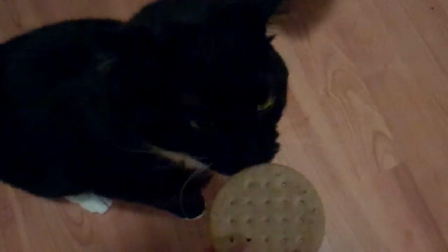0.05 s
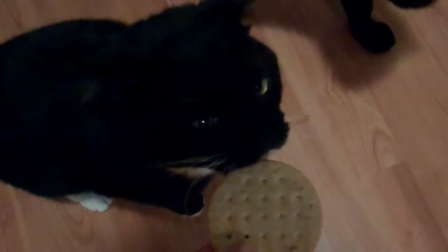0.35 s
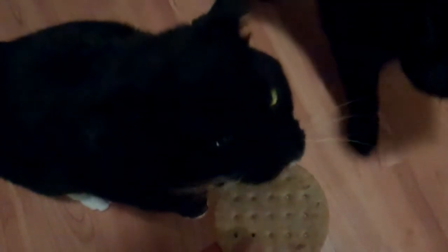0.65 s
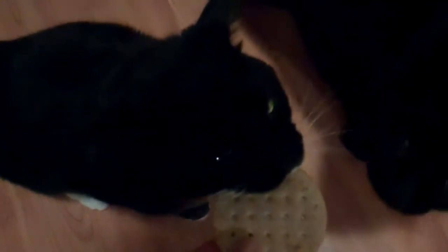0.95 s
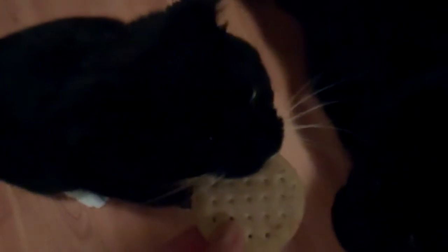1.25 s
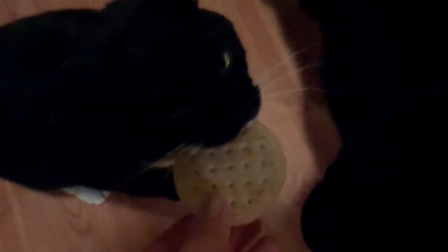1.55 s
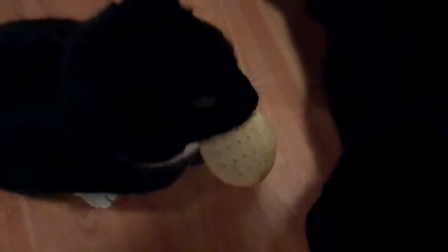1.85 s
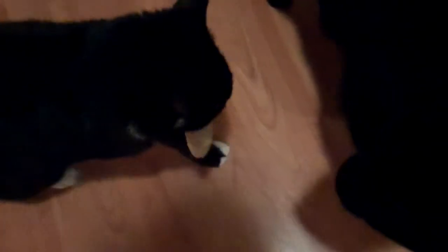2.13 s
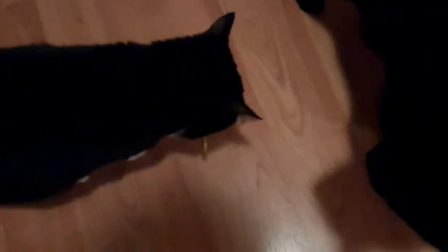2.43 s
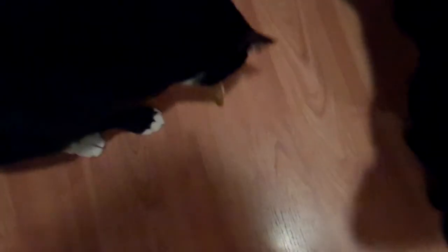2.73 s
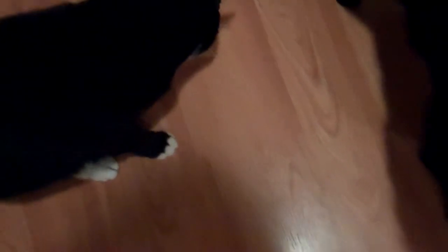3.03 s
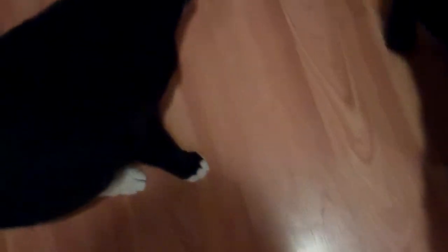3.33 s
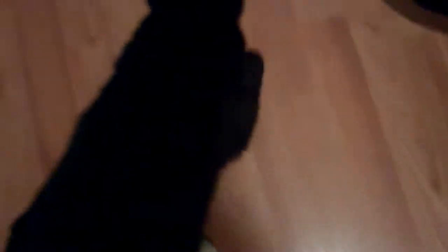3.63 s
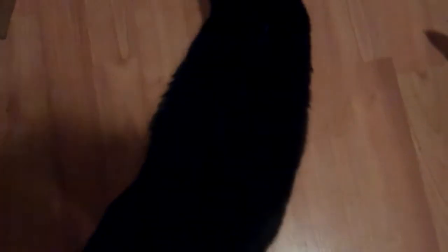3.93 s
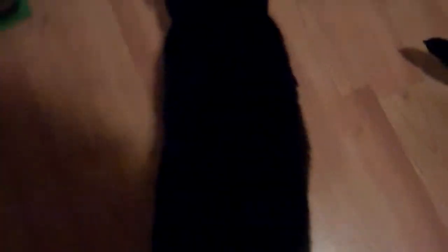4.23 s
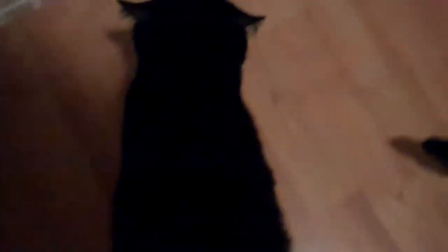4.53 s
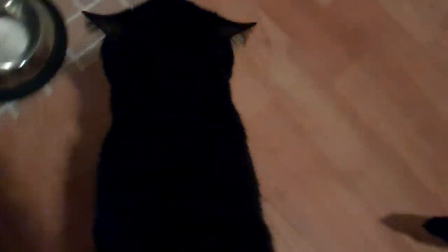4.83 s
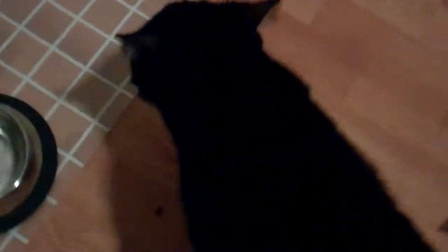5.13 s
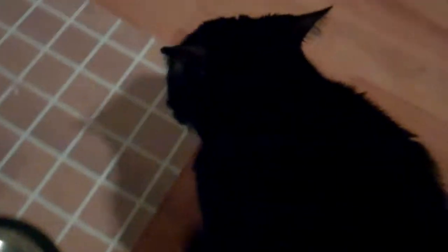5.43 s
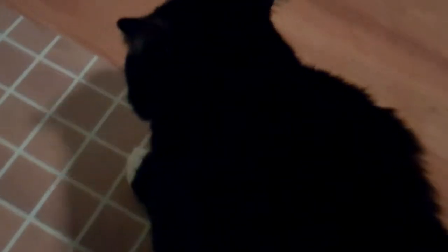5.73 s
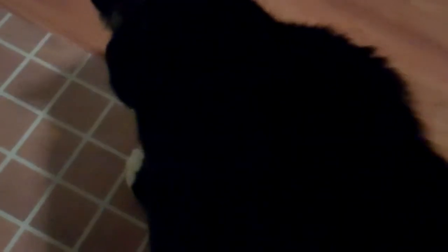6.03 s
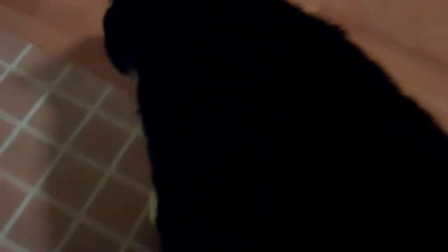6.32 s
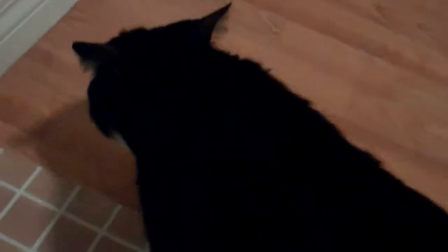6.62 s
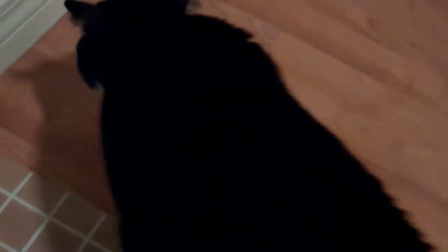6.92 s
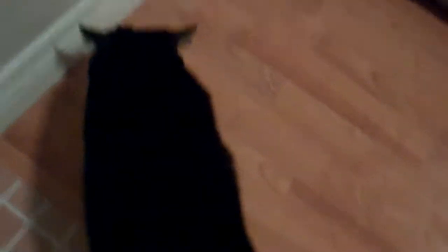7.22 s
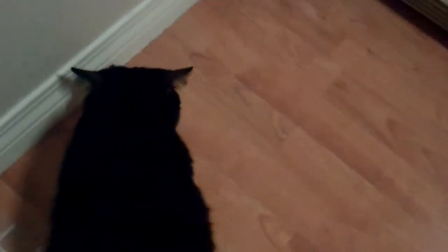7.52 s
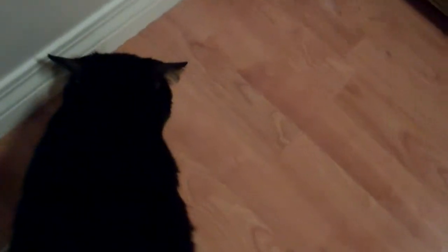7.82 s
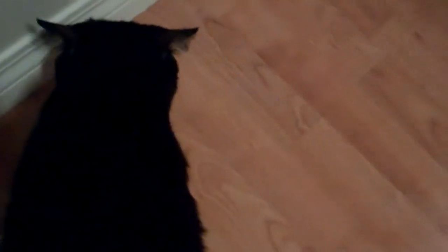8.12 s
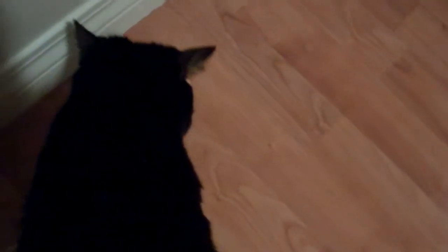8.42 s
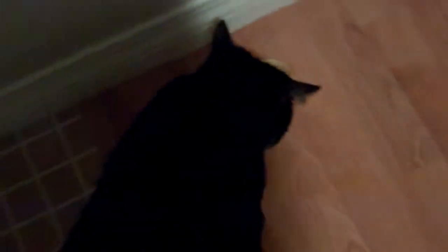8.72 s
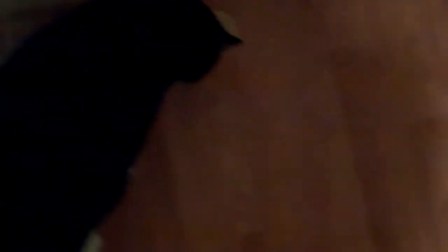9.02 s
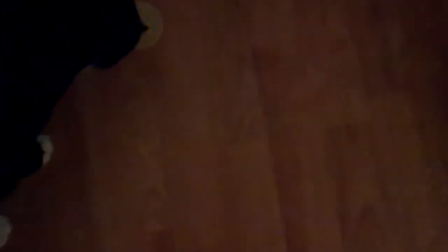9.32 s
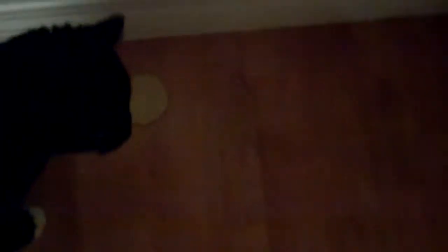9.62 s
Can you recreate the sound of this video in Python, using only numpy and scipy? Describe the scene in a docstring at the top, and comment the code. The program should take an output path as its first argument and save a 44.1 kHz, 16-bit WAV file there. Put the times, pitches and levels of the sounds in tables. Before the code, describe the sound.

Close to the microphones, a cat nibbles a dry cracker with a few faint, brittle snaps. Someone follows across a laminate floor, feet knocking on the hollow boards and clothes swishing, while scattered cracks continue. Near the end comes a busier run of knocks and louder crunches, then a last knock and a sole scuffing. A faint appliance hum and hiss fill the small, hard room.

```python
"""Small dry snaps come first, close to the microphones: a cat nibbles a cracker, carries it across a
laminate floor, crunches it and lets it drop. Each snap is a run of tiny brittle cracks.
Someone follows with the stereo pair: feet knock and scuff on the hollow boards, clothes swish.
Behind it all a mains appliance hums in the small, hard room, and the microphones hiss."""
import sys
import numpy as np
from scipy import signal
from scipy.fft import rfft, irfft, next_fast_len
from scipy.io import wavfile
from scipy.ndimage import map_coordinates

SR = 44100
rng = np.random.default_rng(int(sys.argv[2]) if len(sys.argv) > 2 else 0)


def store_pcm(level_fs):
    """Save levels as 16-bit WAV."""
    pcm = np.round(np.clip(level_fs, -1, 1) * 32767).astype(np.int16)
    wavfile.write(sys.argv[1], SR, np.atleast_2d(pcm).T)


N = 430416
TIME = np.arange(N) / SR
HIT_SAMPLES = 2 ** 15
HIT_HZ = np.fft.rfftfreq(HIT_SAMPLES, 1 / SR)

# Room on snaps and knocks, least at first with the cat close by: (time [s], relative level [dB])
REFLECTIONS = [(1, -8), (3, -1), (4.5, 3), (9.7, -1.5)]
# How the microphones colour a crack, lifting its top: (frequency [Hz], gain [dB])
MIC_SHEEN = [(1000, 8), (3000, 3.5), (5500, 4), (9500, -2), (13500, 6.5)]
# Cracker, teeth and claws, left of centre:
# (time [s], relative level [dB], ring [Hz], left minus right [dB], time to fall 30 dB [s])
BRITTLE_SNAPS = [(0.486, -39, 6000, 5, 0.012), (0.491, -32, 4360, 8, 0.014), (0.687, -43, 2780, 3, 0.008),
                 (0.7191, -29.5, 4900, 8, 0.00082), (0.811, -42.5, 2800, 4, 0.0073),
                 (0.97, -42, 3660, 4, 0.0079), (1.0961, -30, 4050, 7, 0.0036),
                 (1.455, -40.5, 8130, 7, 0.0093), (3.62, -34.5, 6860, 9, 0.017),
                 (3.836, -31.5, 8840, 9, 0.0053), (3.855, -34, 4930, 6, 0.002),
                 (3.919, -24, 11400, 9, 0.0063), (3.954, -26, 6550, 4, 0.0017),
                 (4.194, -24.5, 2280, 6, 0.0095), (4.3585, -30.5, 3250, 7, 0.0074),
                 (4.527, -34, 10680, 9, 0.012), (4.875, -20, 2700, 8.5, 0.12),
                 (5.154, -29, 7510, 10, 0.0036), (5.243, -21, 10300, 15, 0.04),
                 (5.651, -28, 4350, 5, 0.0034), (6.909, -38.5, 7480, 8, 0.012),
                 (6.9695, -30, 4170, 8, 0.01), (7.0149, -24.5, 11400, 10, 0.002),
                 (7.711, -35, 4470, 13, 0.01), (8.214, -19, 4230, 7, 0.027), (8.23, -20, 6960, 4, 0.0064),
                 (8.2734, -26.5, 3830, 10, 0.004), (8.3507, -23.5, 3600, 3, 0.044),
                 (8.357, -25, 6960, 13, 0.0038), (8.454, -9.5, 7100, 6.5, 0.0024),
                 (8.512, -26, 4430, 8, 0.0097), (9.426, -27, 2850, 8, 0.004)]
def snaps():
    """A brittle break is a run of tiny cracks, short in a snap, long in a crunch; the fragment rings."""
    ring_height_db, ring_octaves, bass_cut_db = 4, 0.14, 5
    out = np.zeros((2, N))
    t = np.arange(SR // 25) / SR
    for start, db, ring_hz, pan_db, decay_s in BRITTLE_SNAPS:
        octaves = np.log2((HIT_HZ + 200) / ring_hz)
        ring_db = ring_height_db / (1 + (octaves / ring_octaves) ** 2)
        # a small fragment is weak below its ring, and rolls off above it
        body_db = -bass_cut_db * np.minimum(octaves, 0) ** 2 - 3 * np.log2(1 + 4 ** octaves)
        crack = pulse(ring_db + body_db + along(MIC_SHEEN, HIT_HZ))[:HIT_SAMPLES // 2]
        splinters = stereo_noise(len(t)) * np.abs(rng.standard_normal(len(t))) ** 1.57
        splinters *= amp(-30 * t / decay_s)
        snap = band_limited(signal.fftconvolve(crack[None], splinters, axes=1))
        snap *= np.sqrt(SR / 1000) / np.linalg.norm(snap, axis=1, keepdims=True)  # energy of 1 ms at rms 1
        wet_db = np.interp(start, *np.transpose(REFLECTIONS))
        snap = in_room(snap, early_db=wet_db - 6.5, early_t60=0.024, late_db=wet_db - 10)
        add(out, start, amp(db - 2.1) * lean(pan_db) * snap)
    return out


# The hollow thump of the boards when pitched at THUMP_HZ: (frequency [Hz], level [dB])
THUMP_SPECTRUM = [(40, -26.5), (150, -29.5), (300, -14), (520, -4), (700, 1), (1000, -4.5), (1300, -17.5),
                  (2500, -41), (8000, -37)]
THUMP_HZ = 725
# Wood under a hard contact: (frequency [Hz], width [Hz], level [dB])
CLACK_MODES = [(987, 125, 0), (1510, 180, -4), (1740, 100, -7), (2037, 170, -2.5), (2750, 530, -5.5),
               (3230, 170, -2.5), (3980, 280, -8.5)]
# Narrow floor modes that every blow shares: (frequency [Hz], width [Hz], level [dB])
LAMINATE_MODES = [(234, 24, -3), (533, 19, -4), (641, 9.1, -6), (742, 20, -10.5), (864, 27, -10.5),
                  (1008, 15, -7), (1270, 6.4, 2), (1360, 41, 2), (1712, 55, 5.5)]
# Feet and the dropped cracker on the floor, and the low body of the cat's first bites: (time [s], relative
# level [dB], relative clack [dB], pitch [Hz])
FLOOR_KNOCKS = [(0.4816, -34, 2, 362), (0.7185, -32.5, 8.5, 584), (1.0963, -45, 18, 700),
                (3.618, -45.5, 15, 850), (3.837, -37, 8, 610), (3.921, -39, 13, 700),
                (4.0056, -41.5, 9, 840), (4.1922, -21, 2, 696), (4.8762, -13, -3, 720),
                (4.9623, -28, 1, 640), (7.2304, -21.5, -26, 755), (7.2843, -30.5, -16, 790),
                (7.5197, -13.5, -2.5, 820), (7.5559, -19, -5, 785), (7.5596, -22, -8, 686),
                (7.5626, -22.5, 3, 700), (7.8873, -27, -29, 624), (7.9593, -35, -17, 690),
                (7.9894, -25, -4, 770), (8.0613, -25.5, -16, 710), (8.1063, -16.5, -8.5, 770),
                (8.1193, -22.5, -3.5, 800), (8.185, -33, 6, 770), (8.2084, -23.5, -6, 594),
                (8.2148, -19.5, 4, 690), (8.2303, -24, -3, 850), (8.2495, -30.5, 9, 800),
                (8.2743, -27, -1, 910), (8.3465, -20.5, -4, 760), (8.3593, -22, 0, 920),
                (8.3893, -25.5, 2, 770), (8.4223, -28, 4, 610), (8.4541, -15.5, -5, 816),
                (8.5105, -22.5, 2, 740), (8.6704, -24, -10, 665), (8.8273, -27.5, -7, 710),
                (9.2957, -18, 5.5, 730)]
def knocks():
    """Each blow gives a hollow thump, pitched by where it lands; a hard contact adds a woody clack."""
    out = np.zeros((2, N))
    clack = irfft(resonances(CLACK_MODES, HIT_HZ) / (1 + 1j * HIT_HZ / 4500))
    clack /= np.abs(clack).max()
    for start, db, clack_db, pitch_hz in FLOOR_KNOCKS:
        thump = pulse(along(THUMP_SPECTRUM, HIT_HZ * THUMP_HZ / pitch_hz))
        blow = (thump + amp(clack_db - 3) * clack)[:HIT_SAMPLES // 2]
        wet_db = np.interp(start, *np.transpose(REFLECTIONS))
        blow = in_room(blow, early_db=wet_db - 1.5, early_t60=0.11, late_db=wet_db - 4)
        add(out, start, amp(db - 2) * blow)
    ringing = filtered(out, lambda hz: 1 + sum(resonances([mode], hz) for mode in LAMINATE_MODES))
    return ringing * lean(2.4)


# Short rubs and squeaks: muzzle on the cracker, soles squeaking and sliding on the floor:
# (time [s], length [s], relative level [dB], centre [Hz], width [Hz])
RUBS_AND_SQUEAKS = [(0.415, 0.15, -53.5, 2340, 483), (0.879, 0.13, -50, 2550, 1800),
                    (0.94, 0.064, -58, 3120, 300), (0.88, 0.13, -56, 500, 700),
                    (1.714, 0.34, -55, 10200, 2500), (1.788, 0.32, -61, 1320, 1930),
                    (1.884, 0.1, -55.5, 160, 200), (4.183, 0.13, -55, 230, 130),
                    (2.196, 0.011, -38.5, 1320, 403), (2.59, 0.4, -65, 1310, 500),
                    (5.493, 0.33, -60, 378, 170), (5.649, 0.013, -36.5, 4200, 600),
                    (7.549, 0.018, -25.5, 1520, 650), (7.561, 0.069, -40, 1530, 600)]
# Paws and soles sliding softly on the boards: (time [s], length [s], relative level [dB])
SOFT_SLIDES = [(2.072, 0.2, -55), (2.58, 0.14, -61), (3.215, .15, -60), (3.6, 0.23, -52),
               (3.916, 0.39, -62), (4.197, 0.28, -54.5), (4.426, 0.23, -53), (4.593, 0.26, -59),
               (7.208, 0.36, -53), (7.695, 0.45, -56.5), (8.658, 0.17, -50.5)]
def rubs():
    """Friction swells and fades in one resonance; for the soft slides it is the hollow of the boards."""
    hollow_hz, hollow_width_hz = 723, 580
    out = np.zeros((2, N))
    friction = grainy(rate=260, depth_db=4.5)
    slides = [(*slide, hollow_hz, hollow_width_hz) for slide in SOFT_SLIDES]
    for start, length, db, centre_hz, width_hz in RUBS_AND_SQUEAKS + slides:
        stroke = friction[:, round(start * SR):][:, :round(length * SR)]
        stroke = unit(filtered(stroke, lambda hz: resonances([(centre_hz, width_hz, 0)], hz) ** 1.86))
        add(out, start, amp(db + 2) * stroke * np.hanning(stroke.shape[1]))
    return in_room(out * lean(1.6), early_db=-13, early_t60=0.064, late_db=-15.5)


# The boards under a scraping sole: (frequency [Hz], width [Hz], level [dB])
SCRAPE_MODES = [(780, 230, -2), (1280, 140, -0.5), (1710, 190, 1.5), (2720, 560, 1), (3660, 530, 3),
                (4770, 5400, -9.5)]
# The walker's soles, below the microphones: (time [s], length [s], level [dB])
SOLE_SCUFFS = [(4.198, 0.19, -44.5), (7.218, 0.06, -48.5), (7.54, 0.058, -42.5), (7.984, 0.05, -44),
               (8.767, 0.072, -48), (9.082, 0.075, -47), (9.295, 0.026, -34.5), (9.318, 0.06, -31),
               (9.364, 0.052, -42)]
def scuffs():
    """A sole judders over the boards and sets their resonances going."""
    ramp_s = 0.0061
    force = sum(amp(db) * np.clip(np.minimum(TIME - start, start + length - TIME) / ramp_s, 0, 1)
                for start, length, db in SOLE_SCUFFS)
    scrape = unit(filtered(grainy(rate=530, depth_db=4), lambda hz: resonances(SCRAPE_MODES, hz)))
    return in_room(force * scrape * lean(3.8), early_db=-7, early_t60=0.048, late_db=-14.5)


# Fibres rubbing: (frequency [Hz], relative density [dB])
CLOTH_SPECTRUM = [(100, -55), (300, -11), (500, -3.5), (800, 1.5), (1100, 3), (2000, 1.5), (3200, 6),
                  (6000, 2.5), (10000, 2), (12500, 4), (14200, 5.5)]
# Where the cloth sits across the pair: (frequency [Hz], left minus right [dB])
CLOTH_BALANCE = [(60, 1.0), (110, 0), (200, 1), (380, 0), (700, 1), (1290, 1), (2380, 5), (4400, 3.5),
                 (8120, 5.5), (15000, 13)]
# Strides and turns of whoever carries the microphones:
# (time of peak [s], relative level [dB], rise [s], fall [s], sizzle [dB])
CLOTH_SWISHES = [(2.0, -58, .15, 0.12, 6.5), (3.724, -37.5, 0.059, 0.06, -4.5),
                 (3.96, -45.5, 0.067, 0.13, -3), (4.29, -37, 0.069, 0.044, -0.5),
                 (4.53, -43, 0.081, 0.059, -2), (5.321, -28, 0.11, 0.079, -1.5),
                 (5.55, -49.5, 0.074, 0.21, -5), (7.22, -47, 0.093, 0.12, 2),
                 (7.74, -43, 0.081, 0.072, -2.5), (8.04, -45, 0.036, 0.12, -3.5),
                 (8.39, -42, 0.047, 0.12, -5), (8.76, -48.5, 0.18, 0.25, 0),
                 (9.09, -41, 0.071, 0.048, -2.5), (9.22, -56, .025, .025, 9.5),
                 (9.35, -41, .035, 0.038, -3), (9.55, -43.5, .11, 0.051, -0.5)]
def clothes():
    """Each stride swells and fades a broad swish of fibres; some catch and let go with a tick."""
    sizzle_hz, steepness, flutter_db = 8500, 2.5, 1.5
    ticks = rng.standard_normal((2, N)) * (rng.random(N) < 45 / SR)
    fibres = unit(grainy(rate=1100, depth_db=1.3)) + amp(-18) * unit(ticks)
    swish = coloured(near_walls(fibres, share_db=-9.5), CLOTH_SPECTRUM, CLOTH_BALANCE)
    sizzle = filtered(swish, lambda hz: 1 - 1 / (1 + (hz / sizzle_hz) ** 6))  # the treble of tight cloth
    body_power, sizzle_power = np.zeros(N), np.zeros(N)
    for peak_s, db, rise_s, fall_s, sizzle_db in CLOTH_SWISHES:
        from_peak = np.abs((TIME - peak_s) / np.where(TIME < peak_s, rise_s, fall_s))
        speed = amp(db) / (1 + from_peak ** steepness)
        body_power += speed ** 2
        sizzle_power += (amp(sizzle_db) * speed) ** 2
    strides = np.sqrt(body_power) * (swish - sizzle) + np.sqrt(sizzle_power) * sizzle
    return amp(6 + flutter_db * wobble(30)) * strides


# The appliance's low, middle and high harmonics, each: (mains multiple, relative level [dB])
THROB_LINES = [(2, -3.5)]
DRONE_LINES = [(3, 0), (6, -3), (7, -2)]
BUZZ_LINES = [(5, -7), (8, -3.5), (9, -13.5), (10, -7), (11, -12)]
# The hum along the microphones' path: (time [s], throb [dB], drone [dB], buzz [dB])
HUM_ALONG_PATH = [(0, -63.5, -76, -59), (2, -65, -70.5, -61), (3.3, -68, -72, -62), (4.8, -78, -73, -64),
                  (5.6, -67.5, -65.5, -66), (6.7, -68, -67, -79), (7.5, -67, -71.5, -60.5),
                  (9, -62.5, -83, -65.5), (9.76, -61, -78, -61.5)]
def appliance_hum():
    """Mains harmonics; standing waves trade drone for buzz as the microphones cross the room."""
    mains_hz = 59.9
    times, *levels = np.transpose(HUM_ALONG_PATH)
    out = np.zeros(N)
    for lines, level_db in zip((THROB_LINES, DRONE_LINES, BUZZ_LINES), levels):
        path_gain = amp(np.interp(TIME, times, level_db))
        for multiple, db in lines:
            gain = path_gain * amp(db + 0.83 * wobble(1.98))
            phase = 2 * np.pi * multiple * mains_hz * TIME + 0.12 * wobble(2.25)
            out += gain * np.sin(phase + rng.uniform(0, 2 * np.pi))
    return out * lean(1.5)


# The noise floor of room and microphones: (frequency [Hz], relative density [dB])
ROOM_TONE_SPECTRUM = [(25, -16), (90, -12), (150, -9.5), (300, -12.5), (550, -10.5), (1000, -12.5),
                      (1500, -15.5), (2200, -17), (5000, -15.5), (10000, -15.5), (12500, -14.5),
                      (14200, -12.5)]
# Where it sits across the pair: (frequency [Hz], left minus right [dB])
ROOM_TONE_BALANCE = [(60, 7), (110, -2), (200, 9), (380, 10), (700, 5.5), (1290, 1), (2380, 2.5), (4400, 1),
                     (8120, 3.5), (15000, 8.5)]
def room_tone():
    """Room rumble and microphone hiss, with a thin electrical whine."""
    whine_hz = 7870
    hiss = coloured(stereo_noise(N), ROOM_TONE_SPECTRUM, ROOM_TONE_BALANCE)
    whine = unit(filtered(rng.standard_normal(N), lambda hz: resonances([(whine_hz, 70, 0)], hz) ** 2))
    return amp(-50.5) * hiss + amp(-75.5) * whine


# The tail of the small, hard room: (frequency [Hz], time to fall 60 dB [s])
ROOM_DECAY = [(150, 0.81), (600, 0.37), (3000, 0.53), (12000, 0.29)]
def in_room(sound, early_db, early_t60, late_db):
    """The microphones hear the direct sound, dense near reflections, and a tail that dies by band."""
    t = np.arange(HIT_SAMPLES) / SR
    noise = stereo_noise(HIT_SAMPLES)
    early = noise * (1 - np.exp(-t / 0.0017)) * amp(-60 * t / early_t60)
    hz, frame_s, bands = signal.stft(noise[:, ::-1] * (1 - np.exp(-t / 0.0035)), SR, nperseg=256)
    bands *= amp(-60 * frame_s / along(ROOM_DECAY, hz)[:, None])
    late = signal.istft(bands, SR, nperseg=256)[1][:, :HIT_SAMPLES]
    echo = (amp(early_db) * unit(early) + amp(late_db) * unit(late)) / np.sqrt(HIT_SAMPLES)
    sound = np.atleast_2d(sound)
    return sound + signal.fftconvolve(sound, echo, axes=1)[:, :sound.shape[1]]


def near_walls(x, share_db, count=8):
    """A few copies off floor and walls, inside 15 ms, comb the spectrum."""
    delays = rng.uniform(.001, .015, (count, 2))
    copies = sum(np.array([np.roll(side, round(d * SR)) for side, d in zip(x, pair)]) for pair in delays)
    return x + amp(share_db) * copies / np.sqrt(count)


# How alike the two microphones hear the room: (frequency [Hz], correlation [0 to 1])
PAIR_LIKENESS = [(100, 0.38), (350, 0.79), (700, 0.93), (1400, 0.57), (2800, 0.083), (6000, 0), (14000, 0)]
def stereo_noise(samples):
    """Diffuse noise at a closely spaced pair: partly alike low down, unrelated in the treble."""
    def mid_side_gains(hz):
        angle = np.arccos(np.clip(along(PAIR_LIKENESS, hz), -1, 1)) / 2
        return np.array([np.cos(angle), np.sin(angle)])
    mid, side = filtered(rng.standard_normal((2, samples)), mid_side_gains)
    return np.array([mid + side, mid - side])


def grainy(rate, depth_db):
    """Friction noise: its strength jumps as tiny contacts catch and let go."""
    return stereo_noise(N) * amp(depth_db * wobble(rate))


def coloured(x, spectrum, balance):
    """x given a spectrum and a left-right balance, at rms 1."""
    return unit(filtered(x, lambda hz: amp(along(spectrum, hz)) * lean(along(balance, hz))))


def resonances(modes, hz):
    """Causal response of (centre, width, level) modes, alternating in sign."""
    return sum((-1) ** k * amp(db) * 1j * hz * width / (centre ** 2 - hz ** 2 + 1j * hz * width)
               for k, (centre, width, db) in enumerate(modes))


def pulse(gain_db):
    """The most compact causal pulse with this spectrum, peak 1."""
    cepstrum = irfft(np.log(amp(gain_db)))
    cepstrum[1:HIT_SAMPLES // 2] *= 2
    cepstrum[HIT_SAMPLES // 2 + 1:] = 0
    wave = irfft(np.exp(rfft(cepstrum)))
    return wave / np.abs(wave).max()


def filtered(x, response):
    """x through a response given as a function of frequency."""
    n = x.shape[-1]
    padded = next_fast_len(n + 8192)
    return irfft(rfft(x, padded) * response(np.fft.rfftfreq(padded, 1 / SR)), padded)[..., :n]


def band_limited(x, top_hz=14350):
    """A steep cut at the top of the recorder's band."""
    return filtered(x, lambda hz: 1 / np.sqrt(1 + (hz / top_hz) ** 400))


def along(points, hz):
    """(frequency, value) points read on a log axis."""
    knots_hz, values = np.transpose(points)
    return np.interp(np.log(hz + 1), np.log(knots_hz + 1), values)


def wobble(rate):
    """A smooth random curve, rate knots a second."""
    return map_coordinates(rng.standard_normal(int(N * rate / SR) + 4), [TIME * rate])


def add(track, start_s, sound):
    """Mix a sound into the track."""
    i = max(round(start_s * SR), 0)
    track[:, i:i + sound.shape[-1]] += sound[..., :N - i]


def lean(db):
    """Channel gains for a left-minus-right level."""
    return amp(np.array([np.atleast_1d(db), -np.atleast_1d(db)]) / 2)


def amp(db):
    """Decibels to gain."""
    return 10 ** (np.asarray(db) / 20)


def unit(x):
    """Scaled to rms 1."""
    return x / np.sqrt(np.mean(x ** 2) + 1e-20)


def scene():
    """Cat, walker and room as they reach the microphones."""
    return knocks() + snaps() + rubs() + scuffs() + clothes() + appliance_hum() + room_tone()


def record(dry):
    """The recorder rounds off the very highest peaks and cuts the top of the band."""
    return band_limited(dry / (1 + (dry / .9) ** 8) ** (1 / 8))


dry = scene()
out = record(dry)
store_pcm(out)
```